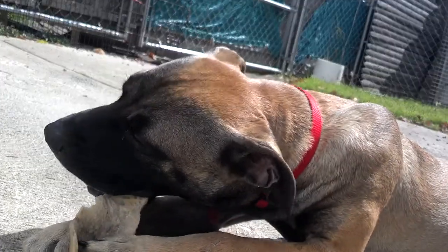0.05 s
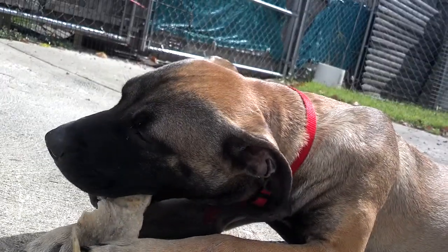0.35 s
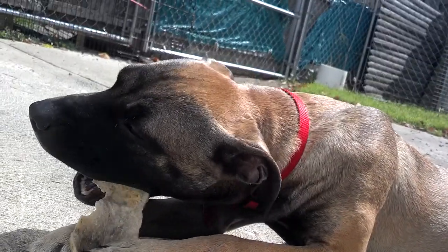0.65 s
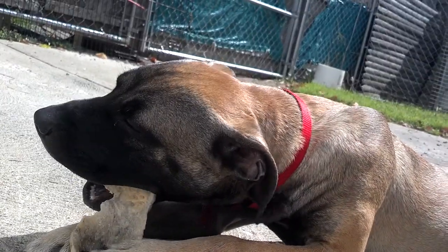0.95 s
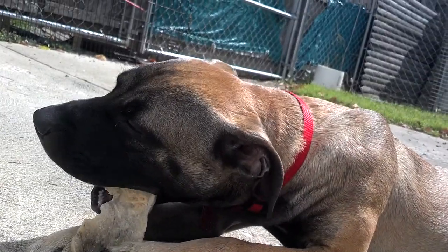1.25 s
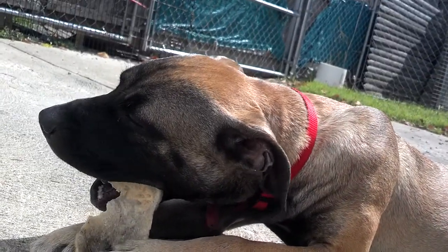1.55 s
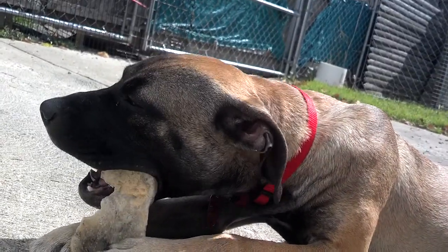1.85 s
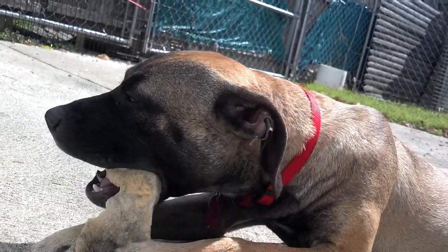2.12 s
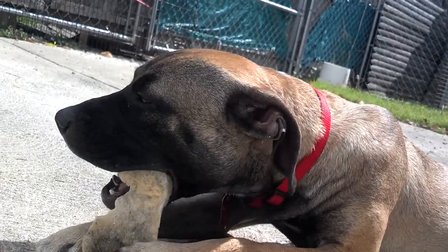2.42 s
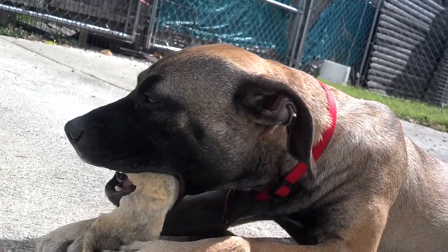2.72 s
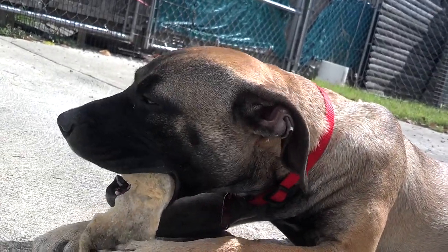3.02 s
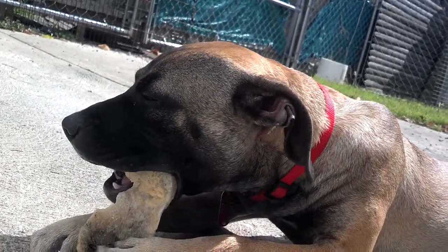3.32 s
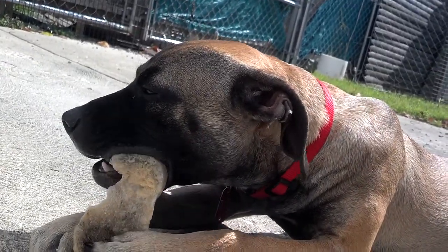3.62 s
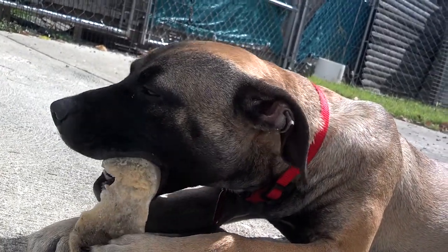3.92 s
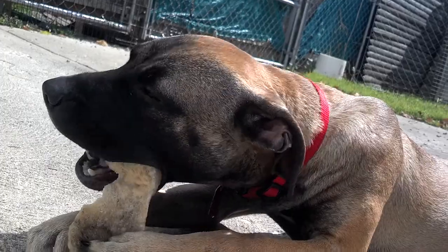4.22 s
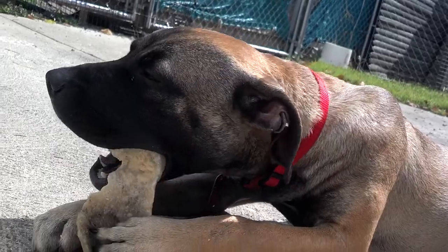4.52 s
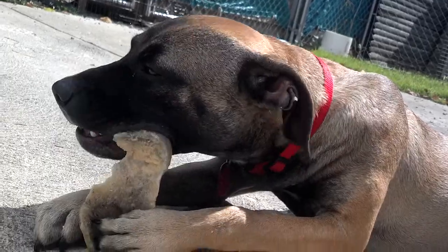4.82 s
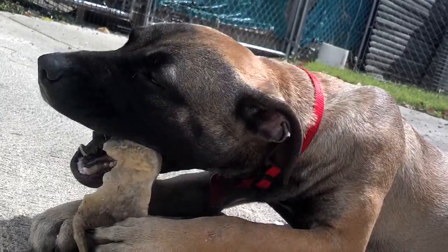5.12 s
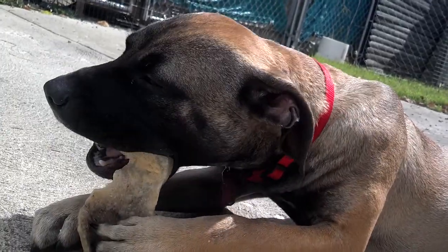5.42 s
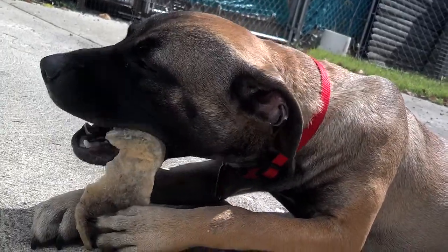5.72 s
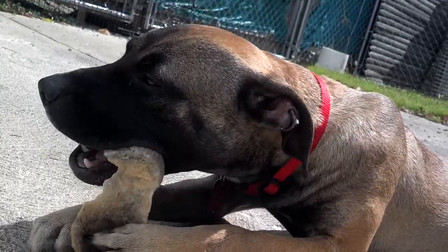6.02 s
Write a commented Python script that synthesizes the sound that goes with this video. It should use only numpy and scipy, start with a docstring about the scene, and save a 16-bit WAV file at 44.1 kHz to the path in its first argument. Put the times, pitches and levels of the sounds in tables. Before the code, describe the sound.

A dog gnaws a hard bone up close, with irregular sharp cracks and hollow knocks, outdoors with a faint distant motor.

```python
"""Sharp cracks and hollow knocks: a big dog gnaws a hard bone on a concrete patio, close to a camera
with two microphone ports. Each slip of a tooth knocks the bone, rings the open mouth and breaks off
splinters; lips and tongue tick wetly. Slab, wall and fence send back short echoes.
Behind the dog are outdoor air and a far motor whose rumble grows in the second half.
The hardest cracks make the camera's limiter duck everything for a second or so."""
import sys
import numpy as np
from scipy import signal
from scipy.fft import rfft, irfft
from scipy.io import wavfile
from scipy.ndimage import uniform_filter1d, minimum_filter1d

SR = 44100
rng = np.random.default_rng(int(sys.argv[2]) if len(sys.argv) > 2 else 0)


def dump(signal):
    """Clip the signal to [-1, 1] and save it as 16-bit WAV at the path in sys.argv[1]."""
    limited = np.clip(np.atleast_2d(signal).T, -1, 1)
    pcm = np.round(limited * 32767).astype(np.int16)
    wavfile.write(sys.argv[1], SR, pcm)


N = 271656

# Tooth slips. Each row: start in seconds, force in dB, knock in Hz, mouth in Hz, mouth ring weight in dB,
# damping as a multiple of the usual, then snap, splinter and fizz in dB relative to the force.
BITES = [(0.0, -23, 576, 858.0, 7.5, 1.1, -1, 0, -11), (0.0058, -26, 540.0, 1360, 0, 0.85, 7.5, 7, 1.0),
         (0.0103, -11.5, 591, 1016, 0, 1.2, -3.5, -23, -19),
         (0.016, -25, 520.0, 1180, -4, 0.9, -1, -6, -11),
         (0.0848, -33.5, 625.0, 900.0, -17, 1.4, -7.5, -12, -14.5),
         (0.1257, -37.5, 696, 910.0, -8.0, 0.84, -14, -18, -31.0),
         (0.139, -40, 654.0, 898, -7, 0.88, -24.0, -21, -31.0),
         (0.539, -34.0, 707, 1290, -3, 0.6, -5.5, -19, -20),
         (0.553, -25.5, 730.0, 1300.0, 1, 1.27, -6.5, -13.5, -27),
         (0.566, -30, 746, 1330.0, -4, 0.74, -19.0, -29, -30),
         (0.6593, -26.5, 627, 1085, -5, 0.89, -24, -21, -40.0),
         (0.6663, -28.5, 598, 1050, -3.5, 1.14, -9, -6.5, -13),
         (0.7156, -32.5, 530, 1127.0, -14.0, 1.3, -23.0, -29, -30),
         (0.78, -37, 644.0, 1149, -0.5, 1.2, -15, -11.5, -21),
         (0.7908, -31.5, 383.0, 890.0, -12.0, 1.9, -11, -16, -21.5),
         (0.8496, -14.5, 561, 1150, 2.5, 1, -2.5, -7, -9.5),
         (1.3176, -27.0, 657, 1090.0, -6.5, 0.87, -13, -16.0, -26.0),
         (1.367, -40, 480.0, 1060, -3, 1.0, -9, -13.0, -22.0),
         (1.4231, -31, 604.0, 1080, 2, 0.86, -0.5, -9.0, -12),
         (1.4265, -25, 598, 1000, -4.5, 1.05, -10.5, -20, -22),
         (1.438, -35.0, 580.0, 1080, -4, 0.99, -18.0, -20, -29.0),
         (1.7086, -34.5, 550, 1070.0, 8, 0.77, -9.5, -21, -25.0),
         (1.7525, -32.5, 622, 1030, -6.5, 0.7, -12, -21.5, -33),
         (1.7807, -36.5, 570.0, 1080.0, 2.5, 0.82, -18.0, -20, -29.0),
         (1.8, -34, 445, 1127.0, -17, 1.1, -22, -24, -26.0),
         (1.8155, -36.5, 394, 1130, -3, 0.8, -12.0, -24, -25),
         (1.8405, -39, 500.0, 1150.0, -3, 0.99, -6.5, -20, -20),
         (1.9183, -19.5, 461, 930.0, -4, 0.81, -10.5, -14.5, -17.5),
         (1.924, -21.5, 312.5, 914, -0.5, 0.65, -13, -21.0, -26),
         (1.952, -42, 401, 1050, 4.0, 1.2, -12.0, -20, -16),
         (1.9941, -45.5, 604.0, 950.0, -2.0, 0.97, -25.0, -25.0, -30.0),
         (2.038, -49, 574, 1040.0, 8.5, 0.66, -20.0, -24.0, -25.0),
         (2.046, -52, 568, 1037, 12.0, 0.8, -24.0, -21.0, -28.0),
         (2.061, -44.5, 506.0, 990.0, 8, 0.92, -28.0, -28, -30),
         (2.1062, -4.5, 648, 980, -5.5, 1.2, 7.5, -12.5, -9.5),
         (2.583, -30.5, 671, 850, 3, 0.93, -10.5, -18.5, -23.5),
         (2.7669, -6, 700, 884, -10.5, 1.57, -4.0, -27, -23),
         (2.7698, -20.5, 560.0, 840.0, 9.5, 0.72, -3, -14.0, -17.0),
         (3.5016, -41.5, 570, 936.0, 0.5, 0.79, -30.0, -28.5, -28.0),
         (3.556, -40, 526.0, 905.0, -10, 1.0, -24.0, -24.0, -28.0),
         (3.6043, -40.5, 480.0, 950, 0.5, 1.1, -11.0, -20.0, -20),
         (4.1746, -22.0, 430, 940, -7.0, 0.78, -23, -26, -30.5),
         (4.194, -34, 368.0, 940.0, -11.0, 0.9, -14, -25, -21.0),
         (4.2403, -31, 616.0, 1005, -4.5, 0.82, -11.5, -27, -16.5),
         (4.419, -35.5, 630, 980, -1.0, 1, -7, -18, -21), (4.4313, -30.5, 523, 770, 3, 0.68, -6, -17, -29),
         (4.7, -32.5, 465.0, 1090, 1.5, 0.8, -28.0, -26.0, -30),
         (4.715, -37.5, 480.0, 1080.0, -1, 1.1, -9, -15, -18),
         (4.729, -34.5, 382.0, 1060.0, -5, 1.2, -12.0, -11.0, -19),
         (4.7651, -26, 700, 1037, 6, 0.55, -16, -23, -24),
         (4.789, -36, 473.0, 1055.0, 3, 0.74, -13, -4, -14),
         (4.7956, -28, 330.0, 900.0, -16.0, 0.92, -11, -11.5, -23),
         (5.22, -24, 560, 990, 0.5, 0.99, -17, -29, -31),
         (5.2593, -36, 488.0, 1000.0, 0, 1.7, -18, -12, -23.0),
         (5.2674, -28.5, 690, 1080.0, -15.0, 1.0, -17.0, -19, -27),
         (5.362, -40, 530.0, 990, -4.0, 0.92, -11, -15, -13),
         (5.4134, -36, 666, 1000.0, -4, 0.61, -5, -15, -21),
         (5.7942, -18.5, 627, 1092, 3, 0.7, -15, -23, -28),
         (5.8131, -25.5, 580.0, 975, 0, 0.81, -14, -25, -22.0),
         (5.8385, -27.5, 587, 1020, -4.5, 0.86, -21, -28.0, -20.5),
         (5.9173, -35, 740.0, 1197, 9.0, 0.86, -12.0, -15, -19),
         (5.973, -35.5, 660, 797, 0, 0.8, -26.0, -23, -29.0)]
# Resonances of the snapping surface. Each row: pitch in Hz, width in Hz, weight in dB.
SNAP = [(1586, 970, 0.5), (2625, 160, 3)]
# Treble resonances of the finest cracks. Each row: pitch in Hz, width in Hz, weight in dB.
FIZZ = [(5820, 900, -4.5), (7200, 2200, -2.5), (12000, 1800, -12.5)]

FRACTURE_S, LEVEL_WINDOW_S = .003, .005  # fracture length at the usual force; window for burst levels
TIME = np.arange(N) / SR
BURST_TIME = np.arange(int(.04 * SR)) / SR
FREQS = np.maximum(np.fft.rfftfreq(N, 1 / SR), 1)


def from_db(db):
    """Decibels to gain."""
    return 10 ** (np.asarray(db) / 20)


def unit_rms(x):
    """Scale to unit rms."""
    return x / np.sqrt(np.mean(x ** 2) + 1e-20)


def unit_burst(x):
    """Scale a short sound to the energy of unit rms over the level window."""
    return x * np.sqrt(LEVEL_WINDOW_S * SR / (np.sum(x ** 2) + 1e-20))


def over_hz(points):
    """Read rows of (Hz, value) on a log-frequency axis, at every spectral line."""
    hz, value = np.transpose(points)
    return np.interp(np.log(FREQS), np.log(hz), value)


def gain_curves(rows):
    """Turn rows of (seconds, dB, ..) into one gain curve for each dB column."""
    times, *columns = np.transpose(rows)
    return [from_db(np.interp(TIME, times, column)) for column in columns]


def add(track, start_s, sound):
    """Mix a short sound into a track."""
    start = int(np.clip(round(start_s * SR), 0, N - 1))
    track[start:start + len(sound)] += sound[:N - start]


def filtered(x, kind, hz):
    """Filter with skirts of 24 dB an octave."""
    return signal.sosfilt(signal.butter(4, hz, kind, fs=SR, output="sos"), x + 1e-18)


def stereo_noise(spectrum):
    """Steady noise of a given spectrum and unit rms, partly alike at the two close ports."""
    # Likeness of the ports. Each row: frequency in Hz, correlation.
    likeness = [(60, 0.34), (300, 0.84), (900, 0.28), (2500, 0), (15000, 0.029)]
    alike = over_hz(likeness)
    mid, side = rfft(rng.standard_normal((2, N)))
    ports = np.sqrt(1 + alike) * mid + np.sqrt(1 - alike) * side * [[1], [-1]]
    return unit_rms(irfft(ports * from_db(over_hz(spectrum)), N))


def outdoor_air():
    """A soft wash of air all around the patio, a little quieter at first."""
    # Colour of the air. Each row: frequency in Hz, relative level in dB.
    air_spectrum = [(30, -23.5), (85, 3), (250, 5.5), (500, -2.5), (1000, -9), (1330, -9), (1450, -6),
                    (1600, -12), (2500, -12.5), (4000, -20), (6000, -27.5), (7100, -16.5), (8100, -14),
                    (9200, -24), (12000, -21.5), (15500, -22.5)]
    # Its level over time. Each row: time in seconds, level in dB.
    air_levels = [(0, -51.5), (1.3, -50), (1.9, -48), (6.1, -47)]
    return gain_curves(air_levels)[0] * stereo_noise(air_spectrum)


def far_motor(wander_hz=.8, wander_s=0.13, throb=0.31):
    """A motor far behind the dog: a growing rumble and a slightly wandering hum at the firing rate."""
    # Colour of the rumble. Each row: frequency in Hz, relative level in dB.
    rumble_spectrum = [(30, -14), (55, -14.5), (85, -8.5), (130, -0.5), (210, 2.5), (280, 0.5),
                       (360, -10.5), (600, -16), (1300, -19), (1900, -20), (8000, -55.5)]
    # The motor slows a little. Each row: time in seconds, mean firing rate in Hz.
    firing_rates = [(4, 88.3), (6, 86.4)]
    # It grows louder. Each row: time in seconds, rumble in dB, hum in dB.
    motor_levels = [(0, -73.5, -63), (2.4, -69, -63), (3.2, -55, -61.5), (4.3, -49.5, -50.5),
                    (4.75, -47, -49), (5.3, -42, -48.5), (5.6, -44.5, -52), (6.0, -38, -47.5)]
    knots = np.arange(0, N / SR, wander_s)
    speed, load = (np.interp(TIME, knots, drift) for drift in rng.standard_normal((len(knots), 2)).T)
    firing_hz = np.interp(TIME, *np.transpose(firing_rates)) + wander_hz * speed
    phase = 2 * np.pi * np.cumsum(firing_hz) / SR
    hum = unit_rms((1 + throb * load) * np.sin(phase))
    rumble_gain, hum_gain = gain_curves(motor_levels)
    return rumble_gain * stereo_noise(rumble_spectrum) + hum_gain * hum


def reflections(x, level_db, t60_s, band_hz, onset_s, delay_s=0):
    """A surface scatters one band back as a dying shower of echoes, different at each port."""
    age = np.maximum(np.arange(SR // 2) / SR - delay_s, 0)
    envelope = from_db(-60 * age / t60_s) * (1 - np.exp(-(age / onset_s) ** 2))
    echoes = rng.standard_normal((2, len(age))) * envelope
    echoes /= np.sqrt(np.sum(echoes ** 2, axis=1, keepdims=True))
    return from_db(level_db) * signal.fftconvolve(x, filtered(echoes, "band", band_hz), axes=1)[:, :N]


def ring(hz, width_hz):
    """A doubly damped resonance: it builds up over about a cycle, then dies in a few more."""
    envelope = BURST_TIME * np.exp(-np.pi * width_hz * BURST_TIME)
    return unit_burst(envelope * np.sin(2 * np.pi * hz * BURST_TIME))


def fracture(modes, length_s, grain_db, clean_s=0):
    """Uneven micro-cracks shower through broad resonances; shorter than clean_s, mostly one break."""
    age = BURST_TIME / length_s
    grains = rng.standard_normal(len(age)) * from_db(grain_db * rng.standard_normal(len(age)))
    cracks = grains * age * np.exp(-2 * age)
    cracks[int(length_s * SR)] += np.linalg.norm(cracks) * (clean_s / length_s) ** 2
    out = 0
    for hz, width_hz, weight_db in modes:
        b, a = signal.iirpeak(hz, hz / (1.5 * width_hz), fs=SR)
        out = out + from_db(weight_db) * signal.lfilter(b, a, signal.lfilter(b, a, cracks))
    return unit_burst(out)


def slowness(force_db, usual_db=-30.5, halving_db=13):
    """A harder bite breaks the surface faster: fracture length relative to that of a usual bite."""
    return min(2 ** ((usual_db - force_db) / halving_db), 1.5)


def splinter_modes(spread_octaves=0.07, spread_db=2.0):
    """No two splinters are alike: the same resonances, each a little shifted and reweighted."""
    # An average splinter. Each row: pitch in Hz, width in Hz, weight in dB.
    usual_modes = [(2890, 400, 6), (3797, 420, 3.7)]
    scatter = rng.standard_normal((len(usual_modes), 2))
    return [(hz * 2 ** (spread_octaves * shift), width_hz, weight_db + spread_db * strength)
            for (hz, width_hz, weight_db), (shift, strength) in zip(usual_modes, scatter)]


def lips(level_db=-9, faint_db=-44, spread_db=2.5, count=14):
    """Films of saliva part with tiny ticks: a few clear ones, and faint ones at random."""
    # Clear ticks. Each row: start in seconds, relative level in dB, treble lift in dB.
    clear_ticks = [(0.285, -48, -8), (.869, -29.5, 2), (0.9122, -31, -5), (.9463, -37, -1),
                   (1.508, -44, -6), (1.548, -28, 6), (2.422, -31.5, -13), (2.666, -37, -9.5),
                   (2.721, -39, -6), (3.265, -41, -0.5), (3.6791, -27, 4), (4.2915, -41.5, 7),
                   (5.8276, -32.5, 0), (5.877, -36, -10)]
    # Resonances of a wet tick. Each row: pitch in Hz, width in Hz, weight in dB.
    wet_modes = [(3450, 1500, 1), (7670, 1760, 2.5), (12520, 14200, -4)]
    starts = rng.uniform(0, N / SR, count)
    faint_ticks = [(start, faint_db + spread_db * rng.standard_normal(), 0) for start in starts]
    out = np.zeros(N)
    for start, tick_db, lift_db in clear_ticks + faint_ticks:
        treble = [(hz, width_hz, weight_db + lift_db) for hz, width_hz, weight_db in wet_modes[1:]]
        tick = fracture(wet_modes[:1] + treble, length_s=0.0013, grain_db=4.5, clean_s=0.001)
        add(out, start, from_db(tick_db + level_db) * tick)
    return out


def tongue():
    """Between the bites, tongue and gums set the mouth ringing with soft pops."""
    # Each row: start in seconds, level in dB, pitch in Hz.
    tongue_pops = [(.284, -48.5, 705), (0.393, -47, 662), (.418, -46.5, 730), (.514, -40, 620),
                   (1.112, -46.5, 617), (1.562, -50, 560), (2.244, -42, 897), (2.304, -49.5, 1114),
                   (2.576, -41.5, 703), (2.667, -41.5, 720), (2.72, -41, 680), (3.003, -50.5, 980),
                   (3.678, -43, 620), (3.686, -38, 420), (3.796, -46.5, 1000), (3.936, -47, 856)]
    out = np.zeros(N)
    for start, level_db, hz in tongue_pops:
        add(out, start, from_db(level_db) * ring(hz, width_hz=400))
    return out


def crumbs(level_db=-12, spread_s=0.0045, length_s=0.0019, count=4):
    """Crumbs of bone crackle around each slow slip, as brightly as the slip itself splinters."""
    out = np.zeros(N)
    for start, force_db, *_, splinter_db, fizz_db in BITES:
        gain = min(slowness(force_db), 1) ** 2 * from_db(force_db + level_db)
        for offset, size in rng.standard_normal((count, 2)):
            splinter = from_db(splinter_db) * fracture(splinter_modes(), length_s, grain_db=4.5)
            fizz = from_db(fizz_db) * fracture(FIZZ, length_s, grain_db=4.5)
            add(out, start + FRACTURE_S + spread_s * offset, gain * size * (splinter + fizz))
    return out


def scraping(level_db=-25, spread_s=.008, low_hz=450, high_hz=1900, count=14):
    """Around each slow slip the tooth rubs the rough bone: a patch of dull grit of mixed pitch."""
    out = np.zeros(N)
    for start, force_db, _, _, ring_db, *_ in BITES:
        # a quick, clean break leaves hardly any grit
        gain = min(slowness(force_db), 1) ** 2 * from_db(force_db + ring_db + level_db)
        for offset, size, pitch in rng.standard_normal((count, 3)):
            hz = np.sqrt(low_hz * high_hz) * (high_hz / low_hz) ** (np.tanh(pitch) / 2)
            add(out, start + spread_s * offset, gain * size * ring(hz, width_hz=480))
    return out


def dragging(knock_hz=570, knock_db=-2, spread_octaves=.16, count=24):
    """A dragged tooth sticks and slips in an uneven run; each slip has its own pitch and sheds a chip."""
    # Each row: middle in seconds, length in seconds, level in dB, mouth in Hz, relative grit in dB.
    tooth_drags = [(0.532, 0.03, -42, 800, -12), (0.84, 0.012, -40.5, 744, -13),
                   (1.409, 0.0067, -51.5, 1160, 4), (1.723, 0.019, -49, 1090, -15),
                   (1.807, 0.019, -40.5, 1090, -27), (1.941, .024, -43.5, 925, -22),
                   (1.993, 0.052, -48, 905, -27), (4.191, .026, -40.5, 900, -16.5),
                   (4.236, 0.033, -39, 960, -14), (4.431, 0.052, -40, 830, -12),
                   (4.76, .028, -37, 1030, -10.5), (4.783, 0.019, -36, 1050, -18),
                   (5.268, .022, -39, 940, -14), (5.366, 0.036, -43, 876, -12),
                   (5.806, 0.024, -36, 1040, -14)]
    out = np.zeros(N)
    for middle, length_s, level_db, mouth_hz, grit_db in tooth_drags:
        gain = from_db(level_db) * np.sqrt(length_s / LEVEL_WINDOW_S / count)
        sizes = gain * unit_rms(rng.standard_normal(count))
        shifts = 2 ** (spread_octaves * rng.standard_normal((count, 2)))
        starts = middle + length_s * rng.triangular(-.5, 0, .5, count)
        for start, size, (mouth_shift, knock_shift) in zip(starts, sizes, shifts):
            knock = from_db(knock_db) * ring(knock_hz * knock_shift, width_hz=380)
            body = unit_burst(ring(mouth_hz * mouth_shift, width_hz=240) + knock)
            chip = fracture(SNAP + splinter_modes() + FIZZ, length_s=0.0024, grain_db=1.5)
            add(out, start, size * (body + from_db(grit_db) * chip))
    return out


def gnawing(mouth_db=-2, linger_db=-16, jaw_ratio=0.616, jaw_db=-10, grind_db=-22, grind_s=0.0027):
    """Each slip knocks bone and jaw, rings the mouth and cracks the surface, amid faint grinding."""
    out = np.zeros((2, N))
    for start, force_db, knock_hz, mouth_hz, ring_db, damping, snap_db, splinter_db, fizz_db in BITES:
        force, slow, modes = from_db(force_db), slowness(force_db), splinter_modes()
        length_s = slow * FRACTURE_S
        # a quick break hardly shakes the jaw
        jaw = min(slow, 1) * from_db(jaw_db) * ring(jaw_ratio * knock_hz, width_hz=190)
        knock = unit_burst(ring(knock_hz, width_hz=damping * 370) + jaw)
        # the hollow of the mouth rings on faintly after the first cycles
        linger = from_db(linger_db) * ring(mouth_hz, width_hz=damping * 100)
        mouth = unit_burst(ring(mouth_hz, width_hz=damping * 280) + linger)
        body = knock + from_db(ring_db + mouth_db) * mouth
        snap = from_db(snap_db) * fracture(SNAP, length_s, grain_db=4.5, clean_s=0.0011)
        splinter = from_db(splinter_db) * fracture(modes, length_s, grain_db=3.0, clean_s=0.00089)
        # the tooth also catches around the slip, more spread out in a slow fracture
        catch_times = start + slow * rng.normal(0, grind_s, size=3)
        catch_gains = force * from_db(grind_db) * rng.standard_normal(len(catch_times))
        for port in out:
            # the finest cracks scatter differently towards each port
            fizz = from_db(fizz_db) * fracture(FIZZ, length_s, grain_db=3.0)
            add(port, start, force * (body + snap + splinter + fizz))
            for catch_s, gain in zip(catch_times, catch_gains):
                add(port, catch_s, gain * body)
    return out


def scene(right_lag_s=.00008):
    """The dog close to the microphone, echoes from slab, wall and fence, air and motor beyond."""
    # The camera body colours the direct sound at the left port. Each row: frequency in Hz, gain in dB.
    body_shading = [(500, 0), (1200, -1), (1900, -5), (2900, -4), (4200, 2), (6000, 0)]
    dog = gnawing() + dragging() + scraping() + crumbs() + tongue() + lips()
    dog = filtered(dog, "high", hz=228)  # a small bone radiates almost no bass
    # the muzzle is left of centre, so its sound reaches the right port later
    arrival = np.array([from_db(over_hz(body_shading)), np.exp(-2j * np.pi * FREQS * right_lag_s)])
    direct = irfft(rfft(dog) * arrival, N)
    slab = reflections(dog, level_db=-11, t60_s=0.025, band_hz=(390, 2000), onset_s=0.00023)
    fence_low = reflections(dog, level_db=-16, t60_s=0.27, band_hz=(198, 1190), onset_s=0.0027)
    fence_high = reflections(dog, level_db=-21.5, t60_s=0.19, band_hz=(1250, 3900), onset_s=0.0025)
    wall = reflections(dog, level_db=-23.5, t60_s=.021, band_hz=(496, 4000),
                       onset_s=0.00077, delay_s=0.017)
    return direct + slab + wall + fence_low + fence_high + outdoor_air() + far_motor()


def limiter(x, threshold_db=-17, excess_share=0.85, hold_s=0.3, recovery_db_per_s=9.5):
    """A loud crack turns the gain down at once; it holds, then creeps back with the background."""
    window, hold = int(LEVEL_WINDOW_S * SR), int(hold_s * SR)
    power = uniform_filter1d(x.mean(axis=0) ** 2, window)
    level_db = 10 * np.log10(np.abs(power) + 1e-12)
    wanted_db = excess_share * np.minimum(threshold_db - level_db, 0)
    held_db = minimum_filter1d(wanted_db, hold, origin=(hold - window) // 2)
    ramp_db = recovery_db_per_s * TIME
    gain_db = np.minimum.accumulate(held_db - ramp_db) + ramp_db
    return x * from_db(uniform_filter1d(gain_db, window // 2))


def record(dry, crossfeed_s=.000405, bass_cut_hz=70, hiss_db=-75.5, top_hz=16100):
    """The camera: stereo widening, port colour, bass cut, limiter, faint hiss, clipping and a top cut."""
    # Widening subtracts the delayed other channel. Each row: frequency in Hz, share before the cap.
    crossfeed_shares = [(100, 0.048), (400, 0.65), (1200, 1), (5000, 0.54), (6500, 0.049), (8000, 0.12),
                        (15000, 0.45)]
    # The left port resonates more than the right. Each row: frequency in Hz, left minus right in dB.
    port_tilt = [(200, 1.5), (2000, -0.5), (4300, -0.5), (6000, 3), (7200, 7), (8200, 10.5), (9400, 0.5),
                 (14000, -1)]
    ports = rfft(dry)
    share = np.minimum(over_hz(crossfeed_shares), .97)
    other_side = ports[::-1] * np.exp(-2j * np.pi * FREQS * crossfeed_s)
    wide = (ports - share * other_side) / np.sqrt(1 + share ** 2)
    coloured = irfft(wide * from_db(over_hz(port_tilt) / 2 * [[1], [-1]]), N)
    limited = limiter(filtered(coloured, "high", bass_cut_hz))
    hiss = from_db(hiss_db) * rng.standard_normal((2, N))
    top_cut = signal.ellip(10, .1, 70, top_hz, fs=SR, output="sos")
    return signal.sosfilt(top_cut, np.clip(limited + hiss, -1, 1))


dry = scene()
out = record(dry)
dump(out)
```